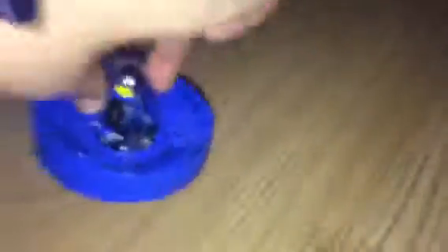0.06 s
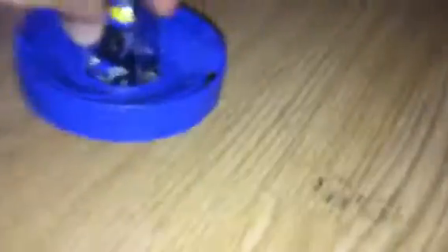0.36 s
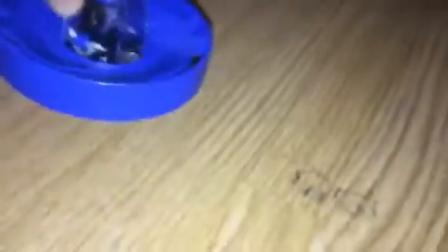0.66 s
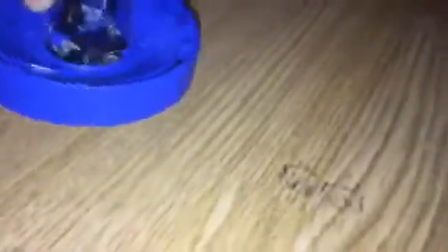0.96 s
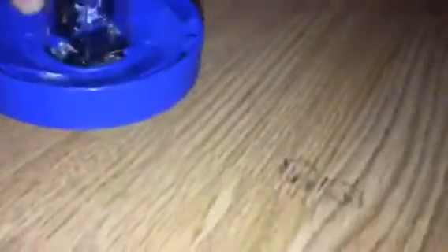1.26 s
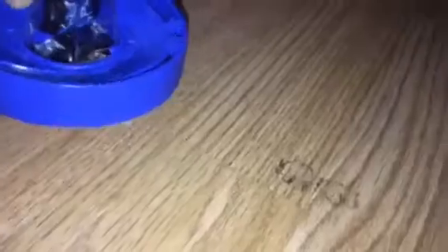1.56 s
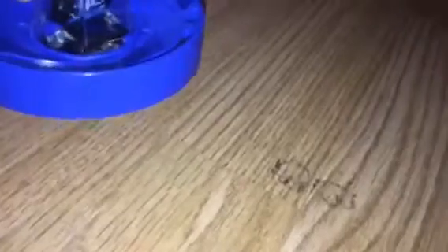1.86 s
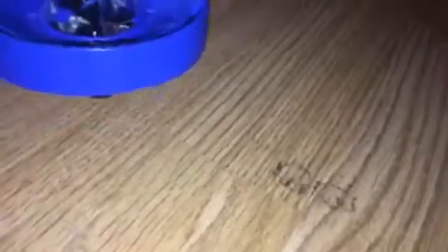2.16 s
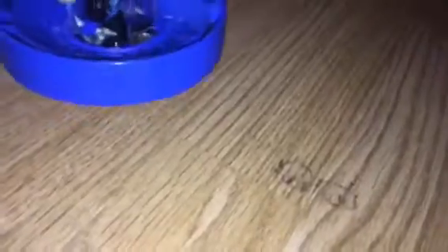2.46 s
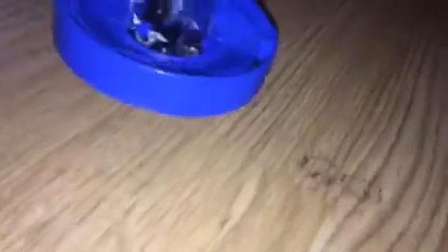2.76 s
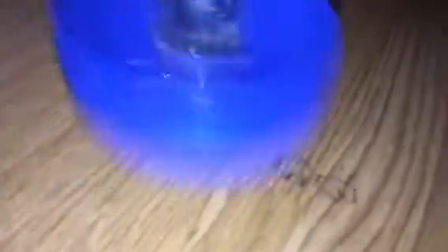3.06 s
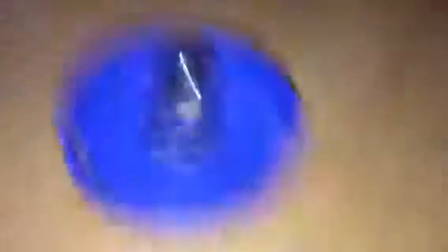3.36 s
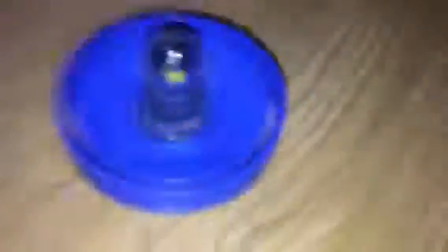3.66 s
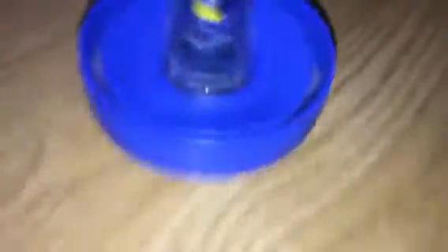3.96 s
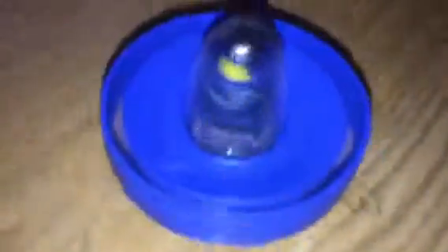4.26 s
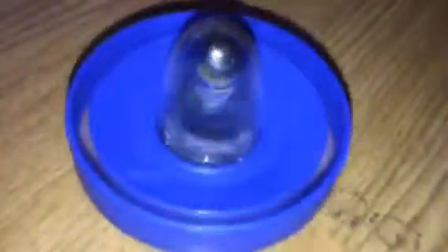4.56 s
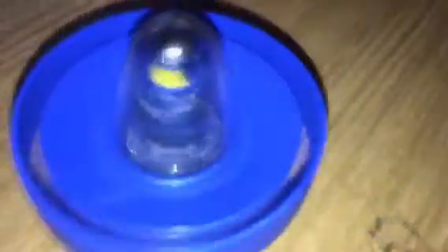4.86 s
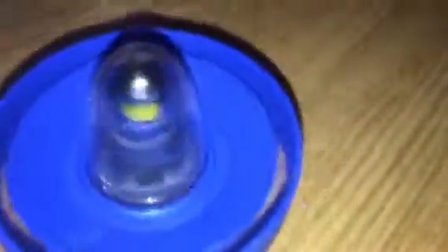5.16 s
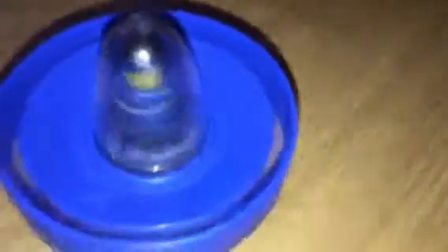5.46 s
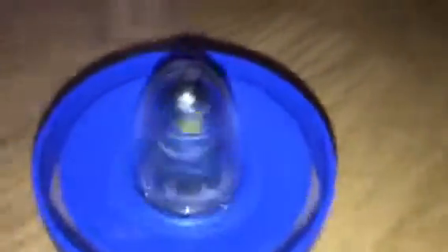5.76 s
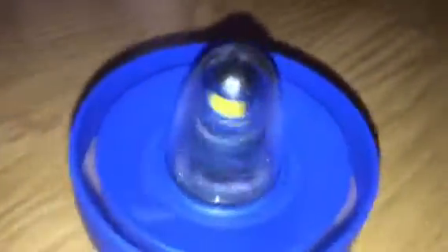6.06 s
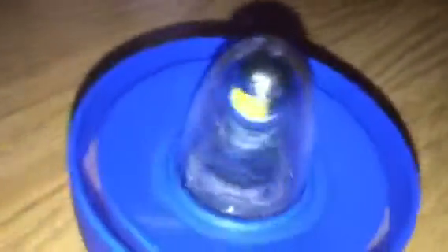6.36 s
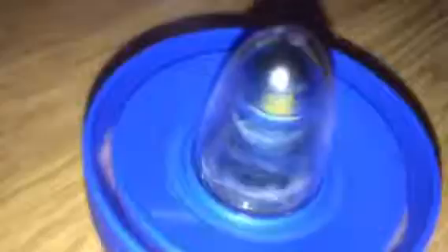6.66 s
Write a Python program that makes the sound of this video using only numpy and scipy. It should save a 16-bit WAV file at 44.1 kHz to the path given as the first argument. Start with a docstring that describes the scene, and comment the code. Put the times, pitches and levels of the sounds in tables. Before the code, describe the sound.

Close by, a plastic spinning top is fitted to its launcher with small clicks, creaks and knocks. A cord rips briefly, and the top drops and bounces on a wooden floor. A loose piece skids off and clacks against something further away. The top whirs and drums on the boards as it slows, then scrapes and strikes its rim. The small room has a faint hum.

```python
"""A small room with a faint hum; the microphone is close to a plastic spinning top on a wooden floor.
First the top is fitted to its launcher with small clicks and knocks. At 3.1 s the cord rips over the gear,
the top drops and bounces, and a loose piece skids away to clack against something further off.
The top spins on, slowing: its tip drums the board, and its rubbed shell beams at the microphone twice a
turn. Just after 6 s it leans and scrapes until its rim strikes the floor."""
import sys
import numpy as np
from scipy import signal
from scipy.fft import rfft, irfft
from scipy.io import wavfile
from scipy.ndimage import uniform_filter1d

SR = 44100
rng = np.random.default_rng(int(sys.argv[2]) if len(sys.argv) > 2 else 0)


def pcm_store(signal):
    """Save signal as 16-bit PCM."""
    levels = np.round(np.clip(np.atleast_2d(signal), -1, 1) * 32767)
    wavfile.write(sys.argv[1], SR, levels.astype(np.int16).T)


N = 296352
T = np.arange(N) / SR
BLOW_T = T[:4096]  # time within one blow
SPIN_FROM_S, CLACK_S, WOBBLE_S, RIM_STRIKE_S = 3.33, 3.9168, 6.25, 6.658


def undb(db):
    """Decibels to gain."""
    return 10 ** (np.asarray(db) / 20)


def unit(x):
    """Scale to rms 1."""
    return x / np.sqrt(np.mean(x ** 2))


def fade(t, t60):
    """Exponential decay, 60 dB in t60 seconds."""
    return np.exp(-np.log(1000) * t / t60)


def gate(start, end, ramp):
    """1 between start and end, with straight ramps outside."""
    return np.clip(np.minimum(T - start, end - T) / ramp + 1, 0, 1)


def add(out, s, x):
    """Mix x into out at time s."""
    i = int(s * SR)
    out[i:i + len(x)] += x[:N - i]


def colour(x, points, size=4096):
    """Minimum-phase filter through (frequency [Hz], gain [dB]) points."""
    hz, db = np.transpose(points)
    bin_hz = np.arange(size // 2 + 1) * SR / size
    gain = undb(np.interp(np.log(bin_hz + 1), np.log(hz), db))
    cepstrum = irfft(np.log(gain))
    cepstrum[1:size // 2] *= 2
    cepstrum[size // 2 + 1:] = 0
    return signal.fftconvolve(x, irfft(np.exp(rfft(cepstrum))))[:len(x)]


def band(x, hz, width):
    """Two-pole resonance, gain 1 at the centre."""
    return signal.lfilter(*signal.iirpeak(hz, hz / width, fs=SR), x)


def highpass(x, hz):
    """Second-order bass cut."""
    return signal.sosfilt(signal.butter(2, hz, "high", fs=SR, output="sos"), x)


def wander(per_s, size=N):
    """Smooth random drift, rms 1."""
    k = int(SR / per_s)
    steps = np.repeat(rng.standard_normal(size // k + 1), k)
    return unit(uniform_filter1d(steps, k)[:size])


def moments(start, end, per_s):
    """Irregular times, about per_s a second."""
    slots = np.arange(start, end, 1 / per_s)
    return np.minimum(slots + rng.random(len(slots)) / per_s, end)


def lobe(turns):
    """A narrow bump, 0 to 1, once a turn."""
    return np.exp(2 * np.pi * (np.cos(2 * np.pi * turns) - 1))


# still air in the room: (frequency [Hz], relative level [dB])
AIR_SPECTRUM = [(20, -23), (35, -20), (60, -10), (100, -5.5), (140, -19), (185, -16.5), (280, -20),
                (430, -28), (760, -28.5), (1000, -29), (1800, -32), (3000, -41.5), (6000, -46),
                (16000, -53.5)]
# tones of an appliance, at the microphone: (frequency [Hz], level [dB])
HUM_TONES = [(59.2, -67), (102.3, -66), (180, -74.5), (355.3, -68), (764.4, -82)]


def room_tone(air_db=-59):
    """All around the microphone: still air and the wavering hum of an appliance."""
    air = unit(colour(rng.standard_normal(N), AIR_SPECTRUM)) * undb(air_db + wander(3.9))
    hum = np.zeros(N)
    for hz, db in HUM_TONES:
        amplitude = np.sqrt(2) * undb(db + 1.4 * wander(3.2))
        hum += amplitude * np.sin(2 * np.pi * hz * T + 0.29 * wander(9.1))
    return air + hum


# what the walls send back: (frequency [Hz], gain [dB])
WALL_SPECTRUM = [(100, -12), (250, 0), (500, -3), (1000, -5), (2000, -2), (4000, -5.5), (8000, -6.5),
                 (16000, -5)]


def room_echo(x, delay_s=0.006, low_t60=.27, high_t60=.22):
    """Diffuse echo of a small furnished room; the treble dies first."""
    t = T[:SR // 2]
    noise = rng.standard_normal(len(t))
    low = signal.sosfilt(signal.butter(1, 2500, fs=SR, output="sos"), noise)
    tail = low * fade(t, low_t60) + (noise - low) * fade(t, high_t60)
    tail *= np.clip(t / delay_s - 1, 0, 1)
    return signal.fftconvolve(x, colour(unit(tail) / np.sqrt(len(t)), WALL_SPECTRUM))[:N]


# hand and toy on the floor nearby: (time [s], level [dB], frequency [Hz], t60 [s])
FLOOR_THUMPS = [(0.069, -44, 81, .12), (1.945, -41, 207, 0.051), (3.116, -30.5, 78, 0.13),
                (3.244, -24, 55, 0.1)]


def thumps():
    """Soft pushes on the floor, each one low damped tone."""
    out, t = np.zeros(N), T[:SR // 4]
    for s, db, hz, t60 in FLOOR_THUMPS:
        add(out, s, undb(db) * fade(t, t60) * np.sin(2 * np.pi * hz * t))
    return out


def ring(modes, detune):
    """Damped modes; each blow lands elsewhere and shifts them a little."""
    out = np.zeros(len(BLOW_T))
    for hz, db, t60 in modes:
        shifted_hz = hz * (1 + detune * rng.standard_normal())
        out += undb(db) * fade(BLOW_T, t60) * np.sin(2 * np.pi * shifted_hz * BLOW_T)
    return out


# the floorboard under the toy: (frequency [Hz], relative level [dB], t60 [s])
BOARD_MODES = [(263.6, -8, 0.034), (335, -6, 0.021), (463, 3, 0.024), (534, 0.5, 0.019),
               (689, -6.5, 0.0097)]


def board(rise_s, shudder_db=-16, shudder_t60=.13, cut_hz=280):
    """The floorboard gives, rings briefly and shudders on; it radiates little bass."""
    tremor = rng.standard_normal(len(BLOW_T)) * fade(BLOW_T, shudder_t60)
    shudder = undb(shudder_db) * unit(colour(tremor, DRUM_SPECTRUM))
    wood = unit(ring(BOARD_MODES, detune=0.065)) + shudder
    return unit(highpass(wood * (1 - np.exp(-BLOW_T / rise_s)), cut_hz))


def crack(t60, tail_db, tail_t60, chatter_db=5, rise_s=0.00044):
    """Crowded modes of stiff plastic: a hard burst, then loose parts chatter and die away."""
    chatter = undb(chatter_db * (wander(450, size=len(BLOW_T)) - 2))
    envelope = fade(BLOW_T, t60) + undb(tail_db) * chatter * fade(BLOW_T, tail_t60)
    return rng.standard_normal(len(BLOW_T)) * envelope * (1 - np.exp(-BLOW_T / rise_s))


# the plastic shell, and the tick of a sharp edge, from close by: (frequency [Hz], relative level [dB])
SHELL_SPECTRUM = [(300, -20), (700, -5.5), (950, -1), (1400, 2.5), (2000, 4.5), (2600, -4), (3300, 2),
                  (4300, -1.5), (5600, -12), (7500, -24.5), (12000, -52)]
EDGE_SPECTRUM = [(2500, -42), (5000, 0.5), (6200, -1.5), (7600, -2.5), (9000, -0.5), (10300, -9.5),
                 (11500, -9), (13000, -11), (16000, -16)]


def tap(ring_hz, knock_db, edge_db, shudder_db=-16, ring_q=3.6):
    """A contact jolts the shell, favours one group of its modes and, a moment later, bends the board."""
    shell = unit(colour(crack(0.0078, -13.5, 0.04), SHELL_SPECTRUM))
    favoured = band(crack(0.0039, -19, 0.019), ring_hz, ring_hz / ring_q)
    tone = unit(band(favoured, ring_hz, ring_hz / 2))
    tick = undb(edge_db) * unit(colour(crack(0.0056, -11.5, 0.034), EDGE_SPECTRUM))
    knock = undb(knock_db) * board(0.0019, shudder_db)
    return undb(-29.7) * (shell + tone) + undb(-16) * tick + undb(-17) * knock


# fingers at work on the top and its launcher: (start [s], end [s])
HANDLING_SPANS = [(0.55, 2.15), (2.75, 3.25)]


def touches(gain_db=-45.5, spread_db=3, ring_hz=2150):
    """Faint clicks at random while the parts are handled near the microphone."""
    out = np.zeros(N)
    for start, end in HANDLING_SPANS:
        for s in moments(start, end, per_s=7):
            size, pitch = rng.standard_normal(2)
            click = tap(ring_hz * np.exp(.15 * pitch), knock_db=-20, edge_db=-32)
            add(out, s, undb(gain_db + spread_db * size) * click)
    return out


# close plastic clicks: (time [s], gain [dB], ring [Hz], floor knock gain [dB], sharp edge gain [dB])
PLASTIC_TAPS = [(0.31, -7.5, 1800, -13, -25), (0.313, -21, 4260, -2.5, -30), (0.333, -31.5, 2080, -5, -14),
                (0.381, -28.5, 3000, -1.5, -25), (0.448, -37.5, 3020, -20, -27),
                (0.795, -26.5, 3840, -40, -26), (0.811, -29.5, 3430, -40, -23),
                (0.898, -33.5, 2110, -39, -17.5), (0.94, -28, 4030, -23, -26), (0.963, -29, 3830, -25, -22),
                (0.968, -24, 2290, -32, -27), (1.031, -12, 2060, -13.5, -33),
                (1.043, -19, 3830, -26, -10.5), (1.048, -14.5, 3330, -22, -32), (1.109, -22, 1840, -4, -27),
                (1.129, -21, 1900, -13.5, -28), (1.168, -19.5, 2060, -9, -27),
                (1.189, -17.5, 1700, -18.5, -28), (1.198, -15, 3370, -32, -22),
                (1.294, -34.5, 1390, 0, -34), (1.385, -26.5, 2980, -22, -35), (1.427, -36, 2000, 0.5, -45),
                (1.473, -26.5, 1310, -21, -23), (1.574, -24.5, 1830, -6.5, -45),
                (1.609, -24, 1810, -40, -32), (1.852, -36, 2030, -25, -40), (1.91, -37, 1990, -18, -42),
                (1.979, -37, 2100, -19, -35), (2.002, -28, 2270, -27, -35), (2.129, -41.5, 1950, -20, -43),
                (2.6778, -8.5, 1350, -11, -23), (2.744, -28.5, 1500, -5, -45),
                (2.748, -21, 1960, -2.5, -26.5), (2.761, -28, 2020, -5, -21), (2.784, -28.5, 2080, -6, -11),
                (2.869, -43, 2680, -12, -17.5), (2.937, -41, 2000, -6.5, -31),
                (3.048, -31.5, 1130, -2, -30.5), (3.158, -17, 3440, -38, -11),
                (3.161, -19.5, 2060, -18, -12), (3.203, -29.5, 2250, -18, -18.5),
                (3.383, -22, 2230, -5, -44), (3.449, -26, 2520, -18, -12.5), (4.118, -30.5, 3580, -9, -17),
                (4.35, -33.5, 3560, -10, -17), (4.551, -33, 3000, -19, -14.5), (6.658, -15, 2050, -10, -28)]


def taps(settle_db=-43, settle_share=.3, settle_from_s=.011, settle_within_s=.035):
    """The distinct clicks and knocks; after each, the parts settle with a small click."""
    out = np.zeros(N)
    mean_db = np.mean([row[1] for row in PLASTIC_TAPS])
    for s, db, hz, knock_db, edge_db in PLASTIC_TAPS:
        add(out, s, undb(db) * tap(hz, knock_db, edge_db))
        later_s = min(s + settle_from_s + settle_within_s * rng.random(), T[-1])
        later_db = settle_db + settle_share * (db - mean_db)
        add(out, later_s, undb(later_db) * tap(hz, knock_db=-18, edge_db=-25))
    return out


def fiddling(clicks, creak_db=-17, rustle_db=-73, grain_db=7, reach_s=0.029):
    """Before the pull, parts slide and creak around each click; fingers rustle as they seat the top."""
    k = int(reach_s * SR)
    strain = uniform_filter1d(uniform_filter1d(np.abs(clicks), k), k)
    grains = rng.standard_normal(N) * undb(grain_db * np.clip(wander(350), -3, 2.5))
    creak = undb(creak_db) * strain * gate(0, 3.08, 0.04)
    rustle = undb(rustle_db) * gate(0.63, 1.92, .2)
    return unit(colour(grains, SHELL_SPECTRUM)) * (creak + rustle)


def specks(gain_db=-45, spread_db=3):
    """The spinning tip ticks against specks of grit, at random."""
    out = np.zeros(N)
    for s in moments(SPIN_FROM_S, WOBBLE_S, per_s=6):
        gain = undb(gain_db + spread_db * rng.standard_normal())
        add(out, s, gain * tap(ring_hz=3200, knock_db=-8, edge_db=-16))
    return out


# hard plastic dragged on wood: (frequency [Hz], relative level [dB])
RASP_SPECTRUM = [(200, -26), (400, -14), (750, -10), (1100, -2), (1650, -3), (2130, 2), (2650, -9),
                 (3200, -8), (3900, -14), (4500, -27), (12000, -41)]


def scrape(rasp_db, knock_db, swell_s=0.0022):
    """A leaning top drags for a few milliseconds: a soft-edged rasp that pushes on the board."""
    drag = rng.standard_normal(len(BLOW_T)) * BLOW_T * np.exp(-BLOW_T / swell_s)
    rasp = unit(colour(drag, RASP_SPECTRUM))
    return undb(rasp_db - 13) * rasp + undb(knock_db - 12) * board(rise_s=0.006)


# the leaning top meets the floor, close by: (time [s], rasp gain [dB], floor knock gain [dB])
HARD_SCRAPES = [(3.666, -44, -34), (4.176, -47, -37.5), (4.783, -46, -38), (4.886, -51.5, -38.5),
                (6.022, -42, -32.5), (6.135, -40, -33.5), (6.27, -38, -36), (6.284, -38, -37.5),
                (6.332, -38, -30.5), (6.355, -40.5, -47), (6.492, -41.5, -39), (6.564, -43, -32.5),
                (6.604, -37, -32), (6.629, -39.5, -40), (6.653, -31, -29)]


def scrapes(spread_db=3):
    """Hard scrapes, and light random grazes: rare while the top is upright, a rattle once it wobbles."""
    out = np.zeros(N)
    for s, rasp_db, knock_db in HARD_SCRAPES:
        add(out, s, scrape(rasp_db, knock_db))
    upright, wobbling = (SPIN_FROM_S, WOBBLE_S, 3, -54), (WOBBLE_S, RIM_STRIKE_S, 25, -45.5)
    for start, end, per_s, rasp_db in (upright, wobbling):
        for s in moments(start, end, per_s):
            add(out, s, undb(spread_db * rng.standard_normal()) * scrape(rasp_db, knock_db=-39))
    return out


# the loose piece sliding off across the floor: (frequency [Hz], relative level [dB])
SKID_SPECTRUM = [(400, -25), (800, 9), (1500, -1.5), (3600, 2), (4600, 0.5), (6300, 1), (8000, 1),
                 (10400, -2), (16000, -1.5)]


def skid(start_s=3.42, end_db=-45, rise_db_per_s=33):
    """Smooth plastic hisses over the grain, louder and louder until it strikes."""
    hiss = unit(colour(rng.standard_normal(N), SKID_SPECTRUM))
    db = end_db - rise_db_per_s * np.maximum(CLACK_S - T, 0)
    return hiss * undb(db + 0.5 * wander(36)) * gate(start_s, CLACK_S, .03)


# the ring of the loose piece as it stops: (frequency [Hz], relative level [dB], t60 [s])
CLACK_MODES = [(350, -17, .03), (920, -5, .013), (1280, -2, .013), (1480, -4, .012), (1850, -4, .012),
               (2060, -1, .012), (2430, -11, .012), (4200, -9, .008)]


def clack(cut_hz=320):
    """Further from the microphone, the skidding piece hits something hard and rings."""
    out = np.zeros(N)
    tone = undb(-27) * unit(ring(CLACK_MODES, detune=.01))
    burst = undb(-29) * unit(colour(crack(.016, -22, .035), RASP_SPECTRUM))
    tick = undb(-50) * unit(colour(crack(0.0029, -29, .02), EDGE_SPECTRUM))
    add(out, CLACK_S, highpass(tone + burst, cut_hz) + tick)
    return out


# the toothed cord in the launcher, close up: (frequency [Hz], relative level [dB])
CORD_SPECTRUM = [(88, -38), (150, -8.5), (457, -20), (649, -11), (1480, -26), (1720, -12), (2270, -13),
                 (4490, 0), (6640, -24), (8070, -13.5), (11700, -24), (14200, -21), (16000, -36)]
# two tugs on the cord: (time [s], hold [s], level [dB])
CORD_TUGS = [(3.103, 0.0027, -30.5), (3.1188, .011, -23.5)]


def cord_rip(tooth_hz=420, rise_db_per_s=2300, fall_db_per_s=1550, catch_s=3.1138, catch_db=-15):
    """The cord's teeth snap over the gear in two tugs; between them one tooth catches hard."""
    teeth_passed = np.cumsum(tooth_hz * (1 + .2 * wander(150))) / SR
    snaps = np.exp(-1.4 * (teeth_passed % 1)) * rng.standard_normal(N)
    pull = np.zeros(N)
    for s, hold_s, db in CORD_TUGS:
        before_s, after_s = np.maximum(s - T, 0), np.maximum(T - s - hold_s, 0)
        pull += undb(db - rise_db_per_s * before_s - fall_db_per_s * after_s)
    catch = undb(catch_db) * fade(np.abs(T - catch_s), t60=0.011) * (T >= catch_s)
    return unit(colour(snaps, CORD_SPECTRUM)) * (pull + catch)


def landing(start_s=3.245, gain_db=9.5, step_db=-8, first_flight_s=.047, restitution=.555):
    """The top drops from the launcher and bounces, each flight shorter and each blow softer."""
    out, s = np.zeros(N), start_s
    for bounce in range(5):
        blow = tap(ring_hz=1600, knock_db=-8.5, edge_db=-14, shudder_db=-22)
        add(out, s, undb(gain_db + bounce * step_db) * blow)
        s += first_flight_s * restitution ** bounce
    return out


# resonances of the rubbed top: (frequency [Hz], width [Hz], gain [dB], faces the microphone at [turns])
RUB_MODES = [(1300, 600, -4, -.06), (1800, 400, -4, -.02), (2830, 360, 0, .01), (3500, 400, -2.5, .02),
             (5250, 300, -10.5, .03), (6600, 520, -6, -.01), (7250, 480, -7.5, .44), (8200, 700, -14, .74),
             (10200, 1800, -28, .02), (15000, 2000, -27, .44)]


def rubbing(turns, press_db=4, beam_db=6, flutter_db=2.6):
    """The crooked tip rubs harder once a turn and rings the shell, whose beams sweep the microphone."""
    grit = rng.standard_normal(N) * undb(press_db * lobe(turns) + 2.6 * wander(2500) + 1.8 * wander(90))
    grit *= undb(7 * np.clip(wander(500) - 1.5, 0, 1.3))  # now and then dust ticks under the tip
    rub = undb(-24) * highpass(grit, 1000)
    for hz, width, db, facing in RUB_MODES:
        mode = grit * undb(flutter_db * wander(160))
        for _ in range(3):
            mode = band(mode, hz, 2 * width)
        rub += undb(db + beam_db * lobe(turns - facing)) * mode
    return unit(rub)


# the drummed board, and its deeper sound under the slower top: (frequency [Hz], relative level [dB])
DRUM_SPECTRUM = [(100, -47.5), (170, -20.5), (255, -11), (320, -9), (385, -1), (440, -0.5), (500, -6),
                 (600, -16), (780, -24), (1100, -43), (2400, -65)]
DEEP_DRUM_SPECTRUM = [(100, -38), (170, -16.5), (260, 1.5), (340, -0.5), (440, -1), (520, -15.5),
                      (620, -15), (780, -21), (1100, -25), (2400, -70.5)]


def drumming(turns, bump_db=2.6, swing_db=3.1):
    """The tip rolls over tiny bumps that drum the board, swelling once a turn and deepening late on."""
    bumps = rng.standard_normal(N) * undb(bump_db * wander(220) - swing_db * np.cos(2 * np.pi * turns))
    early, deep = unit(colour(bumps, DRUM_SPECTRUM)), unit(colour(bumps, DEEP_DRUM_SPECTRUM))
    deep_share = gate(6.57, np.inf, ramp=0.66)
    return (1 - deep_share) * early + deep_share * deep


def spinning_top(start_turns_per_s=27.75, slowing_s=13.2, facing_s=4.9943, lift_db=-8, rough_db=3.5):
    """Close to the microphone the spin slows exponentially: the drumming grows and the rubbing eases."""
    speed = start_turns_per_s * np.exp(-(T - SPIN_FROM_S) / slowing_s)
    speed_lost = start_turns_per_s - speed
    turns = np.cumsum(speed) / SR
    turns -= np.interp(facing_s, T, turns)  # at facing_s the rubbing side faces the microphone
    rough_patch = np.exp(-((T - 5.1) / 0.5) ** 2)  # the tip crosses a rough spot in the floor
    rub_db = -56 - 0.5 * speed_lost + rough_db * rough_patch
    lifted = T > RIM_STRIKE_S  # the rim's strike lifts the top off the board
    drum_db = -47.5 + 0.96 * speed_lost + lift_db * lifted
    whirr = undb(rub_db) * rubbing(turns) + undb(drum_db) * drumming(turns)
    return gate(SPIN_FROM_S, np.inf, ramp=0.022) * whirr


def scene(near_echo_db=-16, far_echo_db=-12, reflection_db=-9, reflection_s=0.0029):
    """One microphone: close clicks get an early reflection; the clack, further off, gets more room."""
    clicks = taps() + touches() + cord_rip() + landing()
    reflection = undb(reflection_db) * np.interp(T - reflection_s, T, clicks)
    handling = clicks + reflection + fiddling(clicks) + thumps()
    near = handling + spinning_top() + specks() + scrapes() + skid()
    far = clack()
    echo = room_echo(undb(near_echo_db) * near + undb(far_echo_db) * far)
    return (near + far + echo + room_tone())[None]


def record(dry, ceiling=.6, bass_hz=40, treble_hz=15900):
    """The phone's microphone clips the hardest blows; deep bass and the highest treble are cut."""
    clipped = np.clip(dry, -ceiling, ceiling)
    treble_cut = signal.ellip(8, .2, 70, treble_hz, fs=SR, output="sos")
    return signal.sosfilt(treble_cut, highpass(clipped, bass_hz))


dry = scene()
out = record(dry)
pcm_store(out)
```